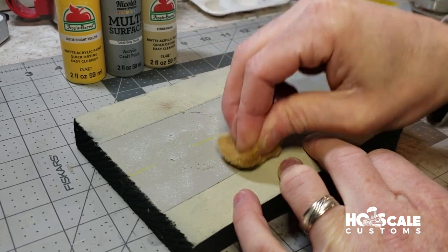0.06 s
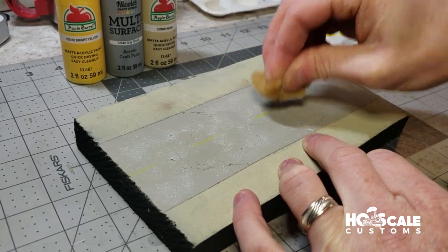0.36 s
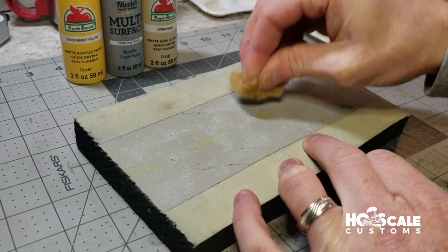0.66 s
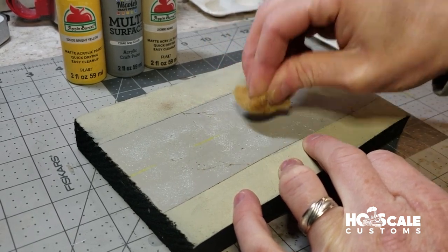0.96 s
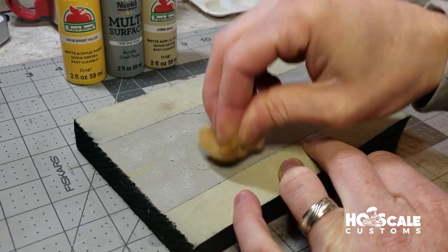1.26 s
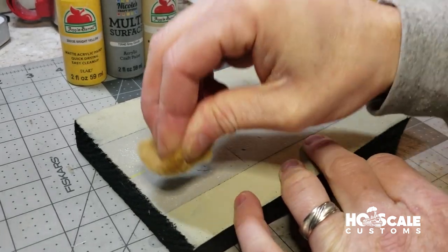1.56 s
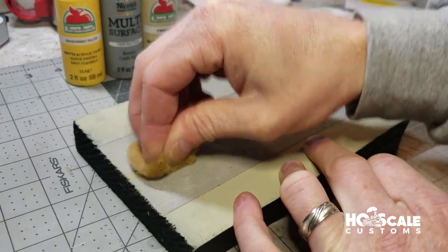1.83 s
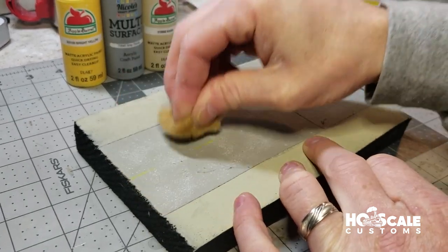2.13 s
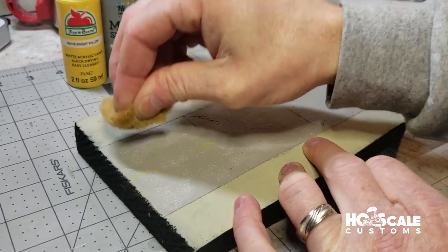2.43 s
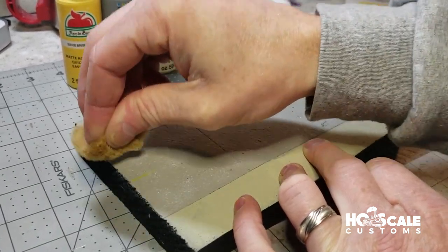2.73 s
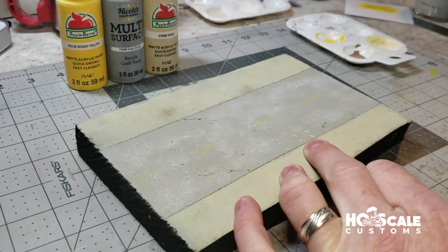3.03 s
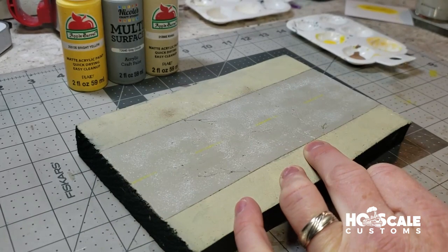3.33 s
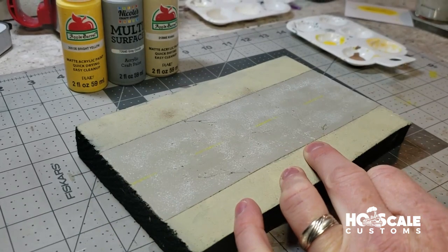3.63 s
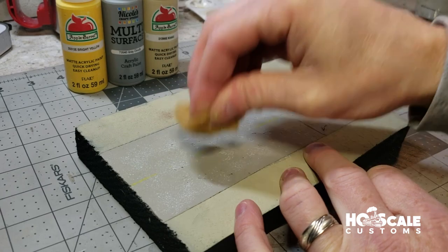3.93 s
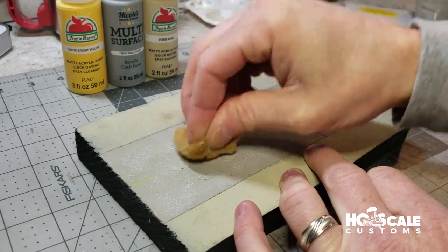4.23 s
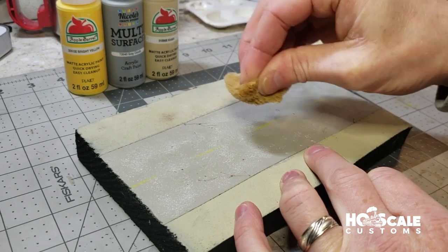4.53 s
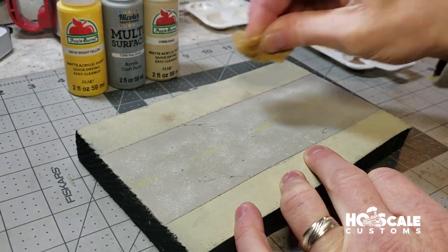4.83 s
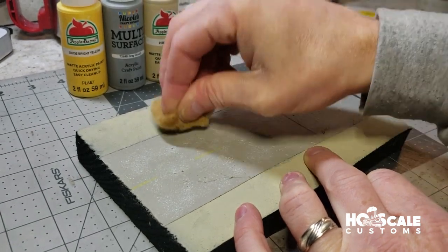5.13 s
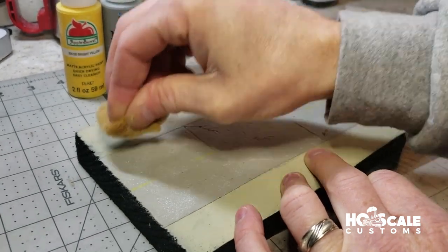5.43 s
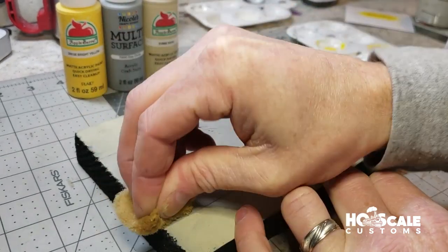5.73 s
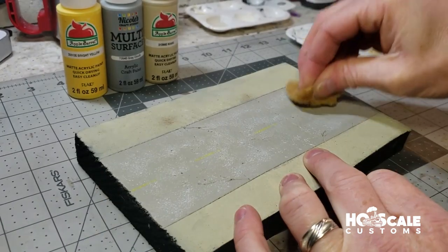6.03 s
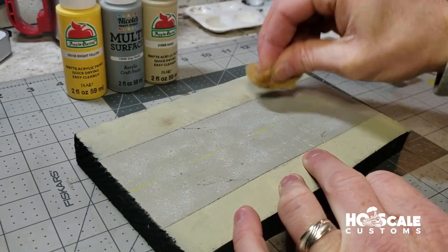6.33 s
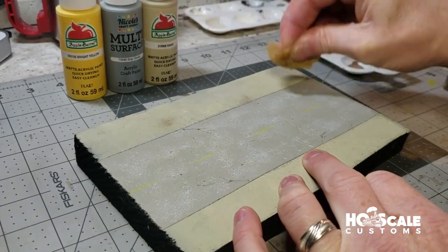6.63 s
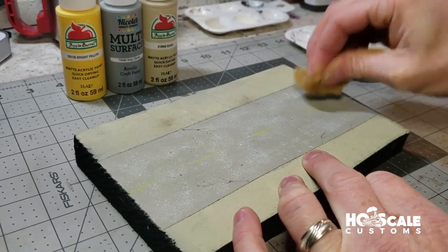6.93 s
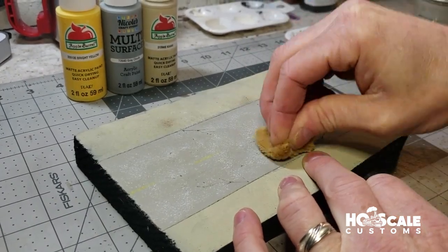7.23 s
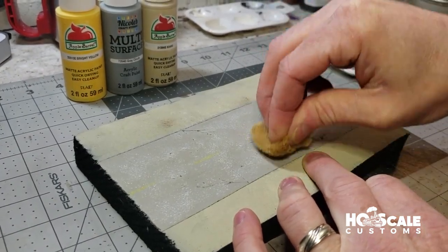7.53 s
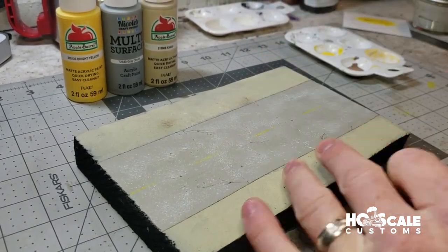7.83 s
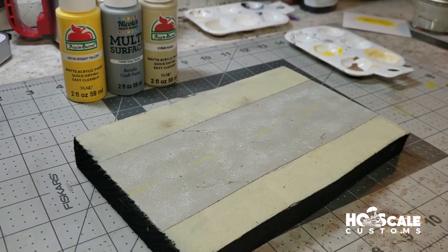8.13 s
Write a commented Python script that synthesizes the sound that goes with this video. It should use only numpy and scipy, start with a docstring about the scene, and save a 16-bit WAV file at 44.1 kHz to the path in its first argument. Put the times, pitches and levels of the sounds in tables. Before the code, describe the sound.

Quick, muffled patting of a dry sponge on foam board runs in bursts with short pauses, lightly crackling, in a small room.

```python
"""A dry sponge is dabbed onto a foam board on a worktable, about 13 times a second, close to a camera.
Each impact radiates a low pressure pulse and excites the damped modes of board and table; a moment
later the sponge's cells buckle and crackle. Nearby surfaces reflect the bass, and the small room
reverberates. There are dull bumps near the microphone and a few low thuds of the table; a sleeve
brushes softly, and a fan hums faintly throughout."""
import sys
import numpy as np
from scipy import signal
from scipy.fft import rfft, irfft, next_fast_len
from scipy.io import wavfile
from scipy.ndimage import uniform_filter1d

SR = 44100
rng = np.random.default_rng(int(sys.argv[2]) if len(sys.argv) > 2 else 0)


def transcribe(signal):
    """Save signal, clipped to [-1, 1], as a 16-bit WAV file at the path in sys.argv[1]."""
    frames = np.atleast_2d(signal).T
    limited = np.clip(frames, -1, 1)
    pcm = np.round(limited * 32767).astype(np.int16)
    wavfile.write(sys.argv[1], SR, pcm)


N = 369107
USUAL_THUMP_DB, USUAL_CRACKLE_DB = -25, -51.5

# impacts of the sponge: t/s, thump level/dB, crackle level/dB
IMPACTS = [(0.015, -22.5, -69), (0.0954, -23, -64.0), (0.1706, -24, -58), (0.243, -23.0, -51),
           (0.3142, -26, -49.5), (0.383, -29.5, -62.5), (0.4553, -28.5, -52.5), (0.5282, -27, -44),
           (0.604, -25.5, -52), (0.6755, -28.5, -53), (0.751, -24.5, -55.5), (0.8279, -28.0, -55),
           (0.8958, -28, -62.5), (0.9718, -28.5, -64), (1.0511, -27.5, -51.5), (1.1272, -29.0, -51),
           (1.1987, -25.5, -60.5), (1.2725, -23.5, -61), (1.3466, -23.5, -63.0), (1.4172, -20.5, -54.5),
           (1.4976, -24, -64.5), (1.5741, -25.5, -65.0), (1.6473, -25.0, -55.5), (1.7244, -26, -53.5),
           (1.7965, -24, -50), (1.8725, -25, -57), (1.949, -23.0, -51), (2.021, -24.5, -50),
           (2.0973, -28.0, -46), (2.1708, -23.0, -48.0), (2.247, -21.5, -45.5), (2.3208, -25.5, -43.5),
           (2.398, -26.5, -47.5), (2.4708, -29.5, -58.5), (2.5504, -34, -61.5), (2.623, -37.5, -65),
           (2.7036, -34, -64.0), (2.7751, -34.0, -61.5), (2.8577, -29, -58.5), (2.9425, -31.5, -57),
           (3.0255, -36, -63), (3.1013, -38.5, -56), (3.1774, -36.5, -45.5), (3.2556, -31.5, -47.5),
           (4.273, -23, -57.5), (4.3485, -22.5, -53), (4.4315, -21, -43.5), (4.551, -21.0, -47.5),
           (4.6254, -21, -48), (4.7174, -23.5, -48), (4.8093, -25.5, -50), (4.8921, -20, -45),
           (4.9642, -23.0, -43.5), (5.038, -20, -46.5), (5.2987, -29.5, -42.0), (5.36, -29, -57.5),
           (5.4301, -24.5, -51), (5.5069, -25, -56), (5.577, -27, -55.5), (5.6473, -25, -60.5),
           (5.722, -29.5, -61), (5.7939, -33.5, -57.5), (5.8644, -30.5, -59.5), (5.9304, -36.5, -60),
           (5.998, -35, -42.5), (6.0658, -37, -48), (6.1376, -33, -47), (6.3645, -21.0, -52),
           (6.4333, -23.0, -52), (6.5026, -18.5, -56.5), (6.572, -24, -65), (6.6416, -27, -59.5),
           (6.7144, -27.5, -47.5), (6.7875, -27.5, -52.5), (6.8589, -29, -53.5), (6.9264, -34.5, -48),
           (7.0008, -29.5, -52.5), (7.0778, -31.5, -47.5), (7.146, -33, -47), (7.2164, -32.0, -49),
           (7.29, -31.5, -51.5), (7.3645, -29.5, -52.5), (7.4373, -26.5, -57), (7.5135, -34.5, -50.5),
           (7.573, -36.5, -67), (7.644, -32.5, -67.5), (7.7151, -32.5, -66), (7.7855, -35.0, -48.5),
           (7.8501, -36.5, -47.5), (7.9332, -31, -45), (8.0067, -33, -46.5), (8.075, -32.5, -42),
           (8.142, -32.0, -42)]
# early reflections from nearby surfaces: delay/s, level/dB
REFLECTIONS = [(0.0137, -5.5), (0.02, -10), (0.0263, -8.5)]
def thumps(pitch_hz=162, octaves_per_db=0.0164, scatter_octaves=0.038, echo_top_hz=140, low_cut_hz=75):
    """Impact radiation: a harder dab gives a shorter, hence higher pulse. Only its bass is reflected."""
    track = np.zeros(N)
    for (s, db, _), chance in zip(IMPACTS, rng.standard_normal(len(IMPACTS))):
        octaves = octaves_per_db * (db - USUAL_THUMP_DB) + scatter_octaves * chance
        start, pulse = pressure_pulse(s, pitch_hz * 2 ** octaves, cycles=0.62, lag=0.15)
        add(track, start, amp(db) * pulse)

    def response(hz):
        echoes = sum(amp(db) * np.exp(-2j * np.pi * hz * delay) for delay, db in REFLECTIONS)
        low_cut = 1 - np.exp(-(hz / low_cut_hz) ** 2)
        return (1 + echoes / (1 + (hz / echo_top_hz) ** 4)) * low_cut
    return filtered(track, response)


# modes of board and table: f/Hz, level/dB, T60/s, left minus right/dB
BOARD_MODES = [(138.6, -31, 0.42, -10), (181.8, -24.5, 0.47, 4.5), (302.7, -9.5, 0.029, 2),
               (388.8, -7.5, 0.022, -1), (356.5, -29.5, 0.18, -2.5), (432.5, -35, 0.047, -10),
               (606.3, -23, 0.091, -8), (689, -28, 0.077, -9.5), (921, -29.5, 0.065, -9.5)]
# spectrum of the board's slap on the mat: f/Hz, level/dB
SLAP_SPECTRUM = [(150, -27), (350, 1), (600, 4.5), (950, -5), (1400, -17), (2200, -22.5), (4000, -42),
                 (8000, -42)]
def board(bottom_out_s=0.005334, attack_s=0.0024, scatter_db=2.5, ring_growth=1.16):
    """Modal vibration: through the flattened sponge, the fingers ring the board and slap it on the mat."""
    track, t = np.zeros((2, N)), np.arange(SR // 3) / SR
    modes = np.array([sides(pan) * amp(db - 60 * t / t60) * np.sin(2 * np.pi * hz * t)
                      for hz, db, t60, pan in BOARD_MODES])
    modes *= 1 - np.exp(-t / attack_s)
    for s, db, _ in IMPACTS:
        ring_db = USUAL_THUMP_DB + ring_growth * (db - USUAL_THUMP_DB)
        mode_gains = amp(ring_db + scatter_db * rng.standard_normal(len(modes)))
        add(track, s + bottom_out_s, np.tensordot(mode_gains, modes, 1))
    landing, thump_db, _ = np.transpose(IMPACTS)
    slap = bursts(landing + 0.0072, thump_db - 28.5, rise=0.0071, fall=0.024)
    return track + slap * hiss(SLAP_SPECTRUM, grain_db=3)[0] * sides(-2)


# lag from landing to buckling: t/s, delay/s
BUCKLING_LAG = [(0.53, 0.011), (0.9, 0.016), (1.13, 0.0112), (2.02, 0.015), (2.32, 0.012), (3.02, 0.018),
                (4.27, 0.01), (4.43, 0.016), (5.04, 0.011), (5.3, 0.0053), (5.36, 0.017), (6.36, 0.01),
                (6.43, 0.01), (6.57, 0.014), (7.44, 0.01), (7.51, 0.0048), (7.85, 0.016), (8.08, 0.0098)]
# spans where the sponge crunches deeper: start t/s, end t/s, crunch gain/dB
DEEP_CRUNCH_SPANS = [(3.07, 3.33, 6.5), (5.96, 6.2, 5)]
# two faint clicks and one light brush of the sponge: t/s, level/dB, rise and fall time/s
CLICKS_AND_BRUSH = [(2.807, -57, .001), (3.419, -61, .001), (8.218, -48.5, 0.0095)]
# spectra of the landing hiss, the crackle and the lower crunch: f/Hz, level/dB
TOUCH_SPECTRUM = [(700, 8), (1300, 4.5), (2200, -3), (4100, -3), (4750, -2.5), (5400, -5), (11000, -5.5),
                  (15000, 2)]
CRACKLE_SPECTRUM = [(1000, -41), (3000, -26), (4000, -12), (4800, -4.5), (5600, -3.5), (8400, 0.5),
                    (10500, -2.5), (12000, 0), (13500, 2.5), (15200, 6.5), (17000, -3.5)]
CRUNCH_SPECTRUM = [(700, -45), (1500, 2.5), (2200, 2), (2800, 4), (3800, 1.5), (5000, -27), (8000, -21)]
def sponge(touch_growth=0.91, crunch_growth=0.73):
    """Friction and buckling: the rough face hisses on landing, then the cells collapse with a crackle."""
    landing, thump_db, crackle_db = np.transpose(IMPACTS)
    buckling = landing + np.interp(landing, *np.transpose(BUCKLING_LAG))
    touch_db = -58 + touch_growth * (thump_db - USUAL_THUMP_DB)
    deep_crunch_db = sum(db * ((landing > start) & (landing < end)) for start, end, db in DEEP_CRUNCH_SPANS)
    crunch_db = -65.5 + crunch_growth * (crackle_db - USUAL_CRACKLE_DB) + deep_crunch_db
    touch = bursts(landing - 0.001, touch_db, rise=0.0036, fall=0.02)
    touch += bursts([0.21], [-67.5], rise=0.041, fall=0.041)  # one brief drag between dabs
    touch = touch * hiss(TOUCH_SPECTRUM, grain_db=4)
    crackle = bursts(buckling, crackle_db + 1, rise=0.0016, fall=0.0033, hold=0.0036)
    crackle = crackle * hiss(CRACKLE_SPECTRUM, grain_db=3)
    crunch = bursts(buckling, crunch_db, rise=0.0013, fall=0.0067, hold=0.0037)
    crunch = crunch * hiss(CRUNCH_SPECTRUM, grain_db=4)
    stray = sum(bursts([s], [db], rise=width, fall=width) for s, db, width in CLICKS_AND_BRUSH)
    stray = stray * hiss(CRACKLE_SPECTRUM, grain_db=3.5)
    return (touch + pores(crackle + crunch + stray)) * sides(-4.5)


# resonance of the pores on the board, shifting as the sponge turns in the fingers: t/s, f/Hz
PORE_RESONANCE = [(1.6, 6500), (3.2, 6600), (4.35, 8550), (5.5, 9000), (6.1, 6500), (7.3, 8900),
                  (7.85, 5610)]
def pores(x, ring_db=4.5, patchy_db=2.5, squeak_from_s=7.75, squeak_hz=2680, squeak_db=12.7):
    """Cavity resonance: air pockets under the sponge colour each crackle; the last dabs squeak a little."""
    hz, t, spectra = signal.stft(x, SR, nperseg=256)
    ring = resonance(hz[:, None], np.interp(t, *np.transpose(PORE_RESONANCE)), width_hz=450)
    squeak = (t > squeak_from_s) * resonance(hz[:, None], squeak_hz, width_hz=150)
    patches = uniform_filter1d(rng.standard_normal(spectra.shape[1:]), size=4, axis=0)
    patches = uniform_filter1d(patches, size=16, axis=1)
    gain = amp(ring_db * ring + squeak_db * squeak + patchy_db * unit(patches))
    gain /= np.sqrt(np.mean(gain ** 2, axis=0))
    return signal.istft(spectra * gain, SR, nperseg=256)[1][:, :N]


# dull bumps near the microphone and a few low thuds of the table: t/s, level/dB, f/Hz
BUMPS_AND_THUDS = [(1.032, -37, 130), (1.059, -26, 297), (1.073, -27.5, 278), (1.834, -30, 110),
                   (4.852, -20.5, 201), (4.869, -14, 360), (4.879, -19, 298), (4.8833, -14.5, 280),
                   (4.8976, -18.5, 280), (4.909, -23.5, 334), (4.925, -15.5, 212), (4.999, -25, 310),
                   (5.82, -37.5, 201), (6.822, -31.5, 171), (7.635, -33, 100)]
# spectrum of their rumble: f/Hz, level/dB
RUMBLE_SPECTRUM = [(25, -29), (85, -2), (140, 3), (800, -26.5), (3000, -59)]
def bumps_and_thuds(left_db=-33):
    """Heavy damping: each is one short swing with a faint rumble, mainly at the right microphone."""
    track = np.zeros((2, N))
    for s, db, hz in BUMPS_AND_THUDS:
        start, pulse = pressure_pulse(s, hz, cycles=0.7, lag=0)
        add(track, start, amp([[db + left_db], [db]]) * pulse)
    times = [s for s, _, _ in BUMPS_AND_THUDS]
    shaking = bursts(times, [0] * len(times), rise=0.023, fall=0.042)
    shaking = np.minimum(shaking, 2)  # quick bumps hardly add up
    return track + amp(-56) * shaking * hiss(RUMBLE_SPECTRUM, grain_db=5.5) * sides(-31)


# strokes of the sleeve as the arm moves: t/s, level/dB, Gaussian width/s
SLEEVE_STROKES = [(2.427, -71, 0.054), (3.363, -81.5, .05), (4.866, -72, 0.038), (5.432, -66, 0.041),
                  (5.812, -73, 0.061), (7.24, -71, 0.05), (8.092, -64.5, 0.025)]
# spectrum of rubbing cloth: f/Hz, level/dB
CLOTH_SPECTRUM = [(2400, -8.5), (3800, 6), (5400, -9), (7300, 3), (8400, 3), (9700, 7), (12000, -6)]
def sleeve():
    """Friction noise: cloth rubs softly in short strokes."""
    t = np.arange(N) / SR
    strokes = sum(amp(db) * np.exp(-0.5 * ((t - s) / width) ** 2) for s, db, width in SLEEVE_STROKES)
    return strokes * hiss(CLOTH_SPECTRUM, grain_db=2.5) * sides(-11.5)


# reverberation time of the small room: f/Hz, T60/s
REVERB_TIMES = [(150, 0.2), (600, 0.3), (3000, 0.16), (8000, 0.075), (15000, 0.058)]
def room(x, gap_s=0.006):
    """Reverberation: a diffuse tail decays exponentially, fastest in the treble."""
    hz, t, spectra = signal.stft(rng.standard_normal((2, SR // 2)), SR, nperseg=256)
    decay = amp(-60 * t / along(REVERB_TIMES, hz)[:, None])
    tail = signal.istft(spectra * decay, SR, nperseg=256)[1]
    tail = np.pad(tail / np.linalg.norm(tail[0]), ((0, 0), (int(gap_s * SR), 0)))
    return signal.fftconvolve(x, tail, axes=1)[:, :N]


# hum lines of the fan: f/Hz, level/dB
HUM_LINES = [(156, -73), (269.2, -65)]
# spectrum of the moving air: f/Hz, level/dB
AIR_SPECTRUM = [(20, -6), (35, -7), (80, -2.5), (145, 3), (190, -5.5), (260, -2.5), (320, 0), (420, -9),
                (550, -3.5), (950, -2.5), (1300, -11), (1650, -19.5), (2400, -24.5), (16000, -33)]
# resonances of the airflow: f/Hz, half width/Hz, rms level/dB
AIR_RESONANCES = [(693, 18.5, -72), (1081, 38, -72.5), (1243, 27, -79.5), (1843, 49.5, -84)]
def fan(air_db=-64.5):
    """Tonal and flow noise: two steady hum lines over moving air and its narrow resonances."""
    t = np.arange(N) / SR
    air = amp(air_db) * diffuse_noise(lambda hz: amp(along(AIR_SPECTRUM, hz)))
    ringing = sum(amp(db) * diffuse_noise(lambda hz: resonance(hz, centre, width))
                  for centre, width, db in AIR_RESONANCES)
    hum = sum(amp(db) * unit(np.sin(2 * np.pi * (hz * t + rng.random()))) for hz, db in HUM_LINES)
    return (air + ringing) * sides(-4) + hum * sides(-1.5)


# likeness of the air noise at the two microphones: f/Hz, correlation coefficient
COHERENCE = [(60, 1), (180, 0.85), (550, 0.9), (1650, 0.59), (4970, 0.12), (15000, 0.02)]
def diffuse_noise(gain):
    """Spatial coherence: noise of rms 1, alike at both microphones in the bass and unlike in the treble."""
    def response(hz):
        angle = np.arccos(np.clip(along(COHERENCE, hz), -1, 1)) / 2
        return gain(hz) * [np.cos(angle), np.sin(angle)]
    mid, side = filtered(rng.standard_normal((2, N)), response)
    return unit(np.array([mid + side, mid - side]))


def pressure_pulse(centre_s, hz, cycles, lag):
    """Monopole radiation: pressure follows the change of a brief flow. Returns start time and pulse."""
    t = np.arange(-SR // 20, SR // 20) / SR
    flow = -np.sin(2 * np.pi * hz * t) * np.exp(-((hz * t - lag) / cycles) ** 2)
    pressure = np.gradient(flow)
    return centre_s + t[0], pressure / np.abs(pressure).max()


def hiss(spectrum, grain_db):
    """Granular noise: tiny snaps of uneven size merge into a coloured stereo hiss of rms 1."""
    sizes = amp(grain_db * np.repeat(rng.standard_normal(N // 16 + 1), 16)[:N])
    return unit(filtered(sizes * rng.standard_normal((2, N)), lambda hz: amp(along(spectrum, hz))))


def bursts(times, levels_db, rise, fall, hold=0):
    """Transient envelope: a Gaussian rise, a hold centred on each time and an exponential fall, in s."""
    track, t = np.zeros(N), np.arange(-SR // 10, SR // 10) / SR
    away = np.maximum(np.abs(t) - hold / 2, 0)
    shape = np.where(t < 0, np.exp(-0.5 * (away / rise) ** 2), np.exp(-away / fall))
    for s, db in zip(times, levels_db):
        add(track, s + t[0], amp(db) * shape)
    return track


def resonance(hz, centre_hz, width_hz):
    """Lorentzian peak: 1 at the centre, one half at width_hz to either side."""
    return 1 / (1 + ((hz - centre_hz) / width_hz) ** 2)


def filtered(x, response):
    """Linear filtering: the spectrum of x times a frequency response."""
    size = next_fast_len(N + SR // 2)
    return irfft(rfft(x, size) * response(np.fft.rfftfreq(size, 1 / SR)), size)[..., :N]


def add(track, s, sound):
    """Superposition: mix a sound into the track from time s."""
    i = int(round(s * SR))
    part = sound[..., max(-i, 0):N - i]
    track[..., max(i, 0):max(i, 0) + part.shape[-1]] += part


def along(points, hz):
    """Interpolation of (f/Hz, value) points on a logarithmic frequency axis."""
    f, values = np.transpose(points)
    return np.interp(np.log(hz + 1), np.log(f + 1), values)


def sides(balance_db):
    """Amplitude panning: two gains for a left minus right level."""
    return amp(np.array([[balance_db], [-balance_db]]) / 2)


def amp(db):
    """Amplitude ratio of a level in decibels."""
    return 10 ** (np.asarray(db) / 20)


def unit(x):
    """Normalisation to rms 1."""
    return x / np.sqrt(np.mean(x ** 2) + 1e-20)


def scene():
    """Superposition: board and sponge with their reverberation, then sleeve, bumps, thuds and fan."""
    knocks = thumps() * sides(-0.27) + board()
    crackles = sponge()
    reverberation = amp(-17) * room(knocks) + amp(-14) * room(crackles)
    return knocks + crackles + reverberation + sleeve() + bumps_and_thuds() + fan()


def record(dry, top_hz=15950):
    """Band limiting: the camera cuts off steeply above its highest frequency."""
    return filtered(dry, lambda hz: 1 / (1 + (hz / top_hz) ** 160))


dry = scene()
out = record(dry)
transcribe(out)
```